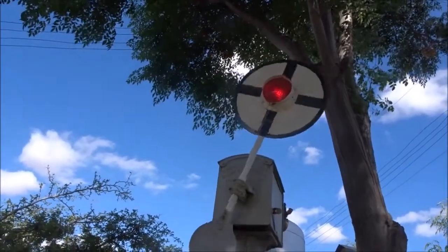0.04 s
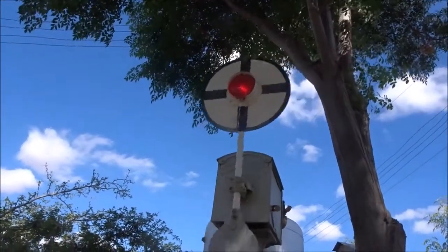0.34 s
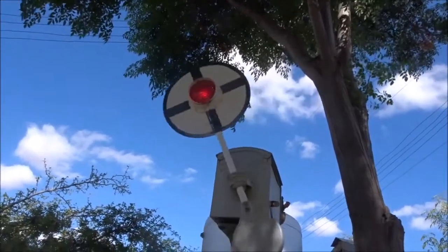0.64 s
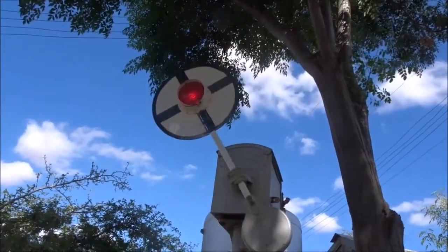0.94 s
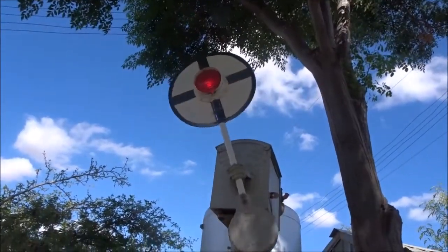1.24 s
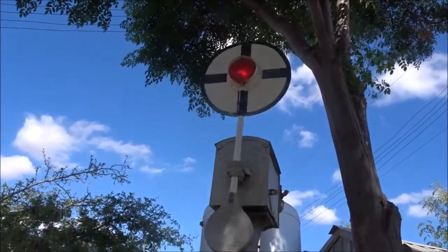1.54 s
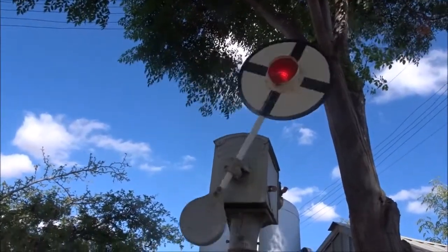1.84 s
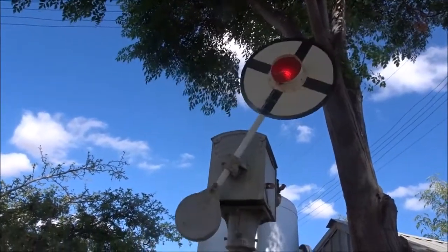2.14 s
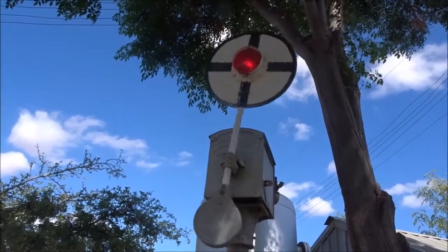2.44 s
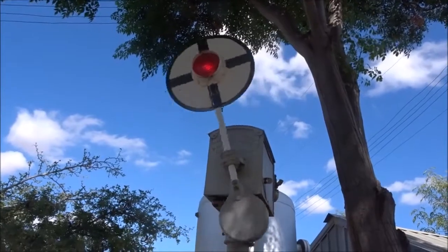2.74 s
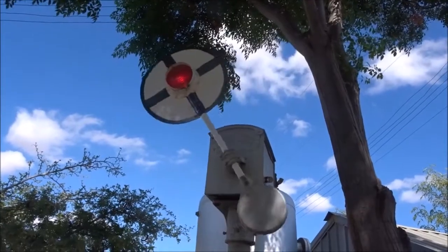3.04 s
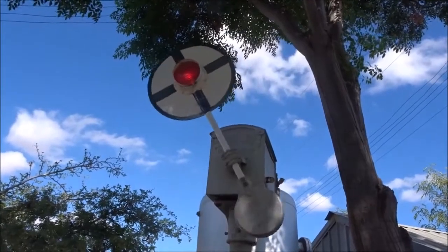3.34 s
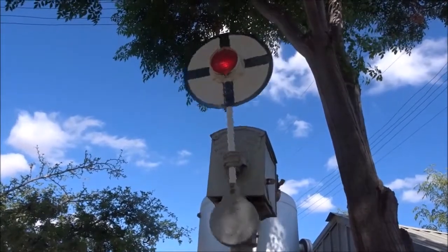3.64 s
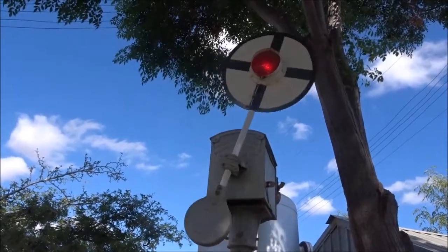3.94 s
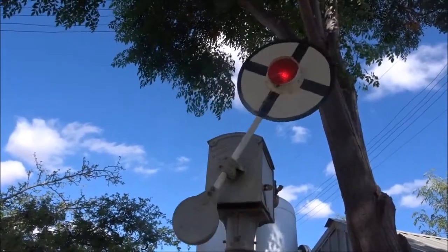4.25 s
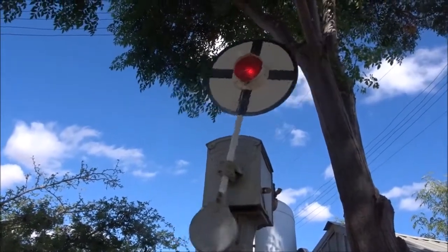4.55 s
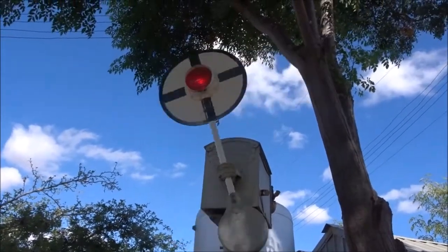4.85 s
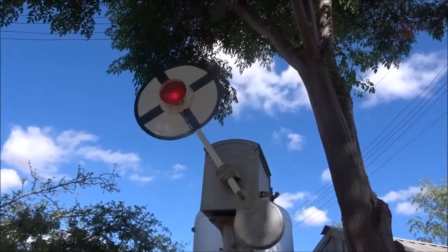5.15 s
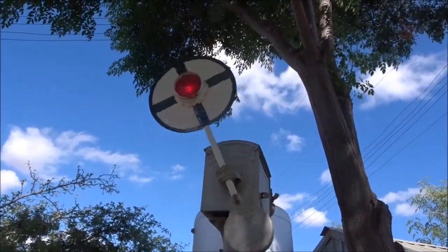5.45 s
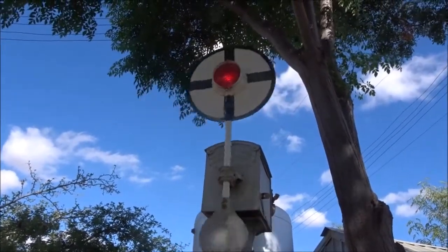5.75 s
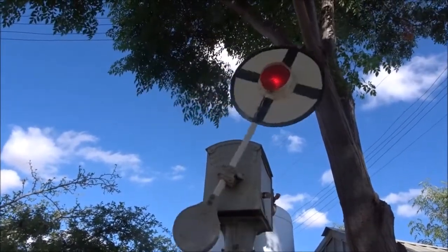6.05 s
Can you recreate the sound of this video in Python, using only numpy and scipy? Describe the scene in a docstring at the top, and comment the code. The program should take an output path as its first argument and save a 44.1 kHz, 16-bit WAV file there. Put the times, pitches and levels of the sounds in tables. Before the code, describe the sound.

A mechanical railroad crossing signal works outdoors, a few metres away. At the start, the faint tail of a bell clang fades out. From about 0.3 seconds the swinging arm's drive gives a quick cluster of metallic knocks and a hollow clack, and this repeats roughly once a second, alternately sharper and duller. After each cluster a hammer strikes a damped bell, at about 0.8, 1.9, 3.0, 4.1 and 5.1 seconds. These clangs are the loudest sounds, bright and clattery, each dying within about half a second. Dry pivots add thin high squeaks and lower raspy creaks in between. A last group of knocks and a clack comes at around 5.7 to 6 seconds. The yard adds a short echo over a faint steady hush, and light wind puffs on the microphone, strongest with a low thump near 1.9 seconds.

```python
"""Outdoors in a yard, a few metres from a wigwag crossing signal that swings to and fro.
On every swing its drive knocks, a contact rocker clacks over, dry pivots squeak by stick-slip friction
and a hammer clangs a damped gong. Each impact excites modes that decay freely, and the yard scatters
a short echo. Light wind puffs on the microphone over a distant hush, and a limiter flattens the start
of each clang."""
import sys
import numpy as np
from scipy import signal
from scipy.fft import rfft, irfft
from scipy.io import wavfile
from scipy.ndimage import uniform_filter1d, minimum_filter1d

SR = 44100
rng = np.random.default_rng(int(sys.argv[2]) if len(sys.argv) > 2 else 0)


def int16_out(signal):
    """Quantize to a 16-bit WAV file."""
    q = np.round(np.clip(np.atleast_2d(signal).T, -1, 1) * 32767)
    wavfile.write(sys.argv[1], SR, q.astype(np.int16))


N = 268628
T = np.arange(N) / SR
RING_TIME = T[:SR]  # the first second after a blow

# swings of the arm: direction, slack_s, drive_s, clack_s, settle_s, squeak_gain_db
SWINGS = [("left", .282, .335, .4846, .575, -3), ("right", 1.488, 1.557, 1.74, 1.82, 2),
          ("left", 2.478, 2.558, 2.696, 2.775, 1), ("right", 3.689, 3.763, 3.923, 4.002, -2),
          ("left", 4.594, 4.674, 4.805, 4.880, 1), ("right", 5.715, 5.783, 5.943, 6.013, -1)]


def undb(db):
    """Decibels to amplitude ratio."""
    return 10 ** (np.asarray(db) / 20)


def unit(x):
    """Normalisation to rms 1."""
    return x / np.sqrt(np.mean(x ** 2))


def fade(t60):
    """Exponential free decay, one second long."""
    return np.exp(-np.log(1000) * RING_TIME / max(t60, .005))


def swell(rise_s):
    """Finite rise time: vibration needs a moment to spread through a struck part."""
    return 1 - np.exp(-(RING_TIME / rise_s) ** 2)


def add(out, start_s, x):
    """Superposition of x on out from start_s on."""
    start = int(round(start_s * SR))
    first, end = max(start, 0), min(start + x.shape[-1], N)
    if end > first:
        out[:, first:end] += x[..., first - start:end - start]


def colour(x, points, size=2048):
    """Minimum-phase filtering through (frequency_hz, level_db) points; white noise keeps its power."""
    hz, db = np.transpose(points)
    grid_hz = np.linspace(1, SR / 2, size + 1)
    curve_db = np.interp(np.log(grid_hz), np.log(hz), db) - 60 * (grid_hz > SR / 3)
    cepstrum = irfft(np.log(unit(undb(curve_db))))
    cepstrum[1:size] *= 2  # folding the cepstrum makes the filter causal
    cepstrum[size + 1:] = 0
    impulse_response = irfft(np.exp(rfft(cepstrum)))
    return signal.fftconvolve(x, impulse_response[None], axes=1)[:, :x.shape[1]]


def shelf(x, hz, low_db=0, high_db=0):
    """First-order shelving: separate gains below and above hz."""
    low = signal.sosfilt(signal.butter(1, hz, fs=SR, output="sos"), x)
    return low * undb(low_db) + (x - low) * undb(high_db)


def wander(rate_hz, count):
    """Linear interpolation between random values, at rms 1."""
    step = max(int(SR / rate_hz), 1)
    stairs = np.repeat(rng.standard_normal(count // step + 1), step)
    return unit(uniform_filter1d(stairs, step)[:count])


def air_noise(count, split_hz=1200, pan_db=1.5, lag_samples=2, diffuse=.65):
    """Partial coherence at two microphone ports: the right leads, and the treble is partly unrelated."""
    mid, side = rng.standard_normal((2, count))
    side = diffuse * signal.sosfilt(signal.butter(1, split_hz, "high", fs=SR, output="sos"), side)
    left = np.roll(mid + side, lag_samples) * undb(pan_db / 2)
    right = (mid - side) * undb(-pan_db / 2)
    return unit(np.array([left, right]))


def burst(t60, treble_hz=3500, treble_stretch=.8):
    """Modal overlap: the dense ringing of struck metal merges into noise whose treble dies sooner."""
    noise = air_noise(SR)
    low = signal.sosfiltfilt(signal.butter(2, treble_hz, fs=SR, output="sos"), noise)
    return low * fade(t60) + (noise - low) * fade(t60 * treble_stretch)


def ring(modes, stretch, spread_hz=6000, pan_db=-1.5, lag_s=.00004, scatter_db=2.5):
    """Modal superposition, mixed anew by each blow; higher modes reach the two ports out of phase."""
    out, t = np.zeros((2, SR)), RING_TIME[:SR // 2]
    for hz, db, t60 in modes:
        phase = rng.uniform(0, 2 * np.pi) + rng.standard_normal((2, 1)) * hz / spread_hz
        cycles = hz * (1 + 0.00492 * rng.standard_normal()) * (t - np.array([[lag_s], [0]]))
        envelope = undb(db + scatter_db * rng.standard_normal()) * fade(t60 * stretch)[:len(t)]
        out[:, :len(t)] += envelope * np.sin(2 * np.pi * cycles + phase)
    return out * swell(rise_s=0.00094) * undb([[pan_db / 2], [-pan_db / 2]])


def yard(x, wet_db, t60, build_s=0.014, dull_db=-5):
    """Diffuse scattering: tree, sheds and ground add a short echo, duller than the direct sound."""
    scatter = air_noise(SR, diffuse=1.0) * fade(t60) * (1 - np.exp(-RING_TIME / build_s))
    echo = shelf(scatter, hz=6300, high_db=dull_db)
    echo /= np.sqrt(np.sum(echo ** 2) / 2)  # unit energy per channel
    return x + undb(wet_db) * signal.fftconvolve(x, echo, axes=1)[:, :N]


def hush(level_db=-51, wander_db=0.58):
    """Incoherent summation: leaves and far surroundings merge into a gently swelling noise."""
    # ambient spectrum: frequency_hz, level_db
    spectrum = [(18, -61), (30, -14), (146, -29), (264, -13), (567, -.5), (822, 1), (930, 2.5), (1640, -9),
                (2000, -3), (2900, -9.5), (4300, -12), (8810, -22), (11000, -24), (14300, -60)]
    noise = unit(colour(air_noise(N, split_hz=600, pan_db=1, diffuse=1.0), spectrum))
    return noise * undb(level_db + wander_db * wander(3.82, N))


def breeze(calm_db=-70.5, wander_db=4.5, attack_s=.035, release_s=.03):
    """Amplitude envelope of the wind: gusts rise, hold and die exponentially over wandering light air."""
    # gusts on the microphone: start_s, length_s, level_db
    gusts = [(.3, .2, -56), (.9, .07, -58), (1.5, .51, -45.5), (1.77, .14, -38), (3.22, .14, -49.5),
             (3.48, .13, -52), (3.84, .14, -51.5), (4.21, .04, -54), (4.76, .16, -54), (5.3, .1, -52)]
    strength = undb(calm_db + wander_db * wander(5, N))
    for start_s, length_s, db in gusts:
        early, late = np.maximum(start_s - T, 0), np.maximum(T - start_s - length_s, 0)
        strength = np.maximum(strength, undb(db) * np.exp(-early / attack_s - late / release_s))
    return strength


def wind(eddy_db=3.5, eddy_rate_hz=60, buffet_hz=270, buffet_s=0.0016):
    """Turbulent pressure: eddies rumble on the microphone, the strongest as single low thumps."""
    # rumble spectrum: frequency_hz, level_db
    spectrum = [(25, -17), (60, -16), (110, -5), (180, 1), (330, 0), (550, -6.5), (1000, -32), (2500, -75)]
    # single thumps: centre_s, level_db
    buffets = [(1.51, -32.5), (1.843, -20), (1.928, -12.5), (1.976, -28), (3.348, -33), (5.356, -35)]
    eddies = air_noise(N, split_hz=150, pan_db=-0.5, diffuse=1.0)
    eddies *= undb(eddy_db * wander(eddy_rate_hz, N))
    out = unit(colour(eddies, spectrum)) * breeze()
    for centre_s, db in buffets:
        t = T - centre_s
        out += undb(db) * np.exp(-(t / buffet_s) ** 2) * np.sin(2 * np.pi * buffet_hz * t)
    return out


def pivots(jitter=0.023, slip_rate_hz=450, rasp=0.51, rasp_rate_hz=420, taper=0.63, lag_s=.00004):
    """Stick-slip friction in dry bearings: short gliding tones that break up into a rasp."""
    # squeaks by direction: after_clack_s, length_s, pitch_hz, glide_octaves, level_db, roughness
    squeaks = {"left": [(-.25, .1, 10020, -.02, -54, .6), (-.104, .048, 6070, -.06, -41, .35),
               (.085, .12, 1690, -.4, -46.5, 1.05), (.18, .13, 1590, .07, -44.3, .8)],
               "right": [(-.092, .14, 6450, .12, -41.5, .7), (.437, .19, 1745, .03, -51, .27)]}
    # squeaks out of turn: start_s, length_s, pitch_hz, glide_octaves, level_db, roughness
    strays = [(.041, .04, 6680, .03, -55, .5), (.063, .05, 10050, -.02, -54, .4),
              (.209, .06, 8640, .03, -46.5, .35)]
    out = np.zeros((2, N))
    regular = [(clack_s + after_s, length_s, pitch_hz, glide, db + swing_db, roughness)
               for direction, _, _, clack_s, _, swing_db in SWINGS
               for after_s, length_s, pitch_hz, glide, db, roughness in squeaks[direction]]
    for start_s, length_s, pitch_hz, glide, db, roughness in regular + strays:
        count = int(length_s * SR)
        hz = pitch_hz * 2 ** (glide * np.linspace(-.5, .5, count))
        hz *= 1 + jitter * roughness * wander(slip_rate_hz, SR)[:count]
        chatter = wander(rasp_rate_hz, SR) + 1j * wander(rasp_rate_hz, SR)
        grip = 1 - min(roughness, 1) + rasp * roughness * chatter[:count]
        cycles = np.cumsum(hz) / SR - hz * np.array([[lag_s], [0]])  # the left port hears it later
        tone = (grip * np.exp(2j * np.pi * cycles)).imag
        add(out, start_s, undb(db) * unit(tone * signal.windows.tukey(count, taper)))
    return out


def linkage(modes_db=-7.5, stretch_per_s=2.6, bounce_s=0.006, bounce_t60=0.063, rise_s=0.002):
    """Backlash: slack in the drive is taken up with a knock and a quick second contact."""
    # slack, drive and settling knocks by direction: level_db, t60_s, body_db, rattle_db
    knocks = {"left": [(-36, .6, 2, -2), (-21, .29, -8, -3), (-26, .34, -.5, -1)],
              "right": [(-45.5, .45, 5, -5), (-27, .52, 3.5, 0), (-28, .29, -1.5, -2)]}
    # loose joints ticking ahead of the drive knock: lead_s, level_db, t60_s, body_db, rattle_db
    ticks = {"left": [(.17, -50, .3, 2, -10), (.125, -47, .45, 3, -4), (.025, -39, .45, 4, 2)],
             "right": [(.022, -46, .25, 13, 0)]}
    # linkage spectrum: frequency_hz, level_db
    spectrum = [(70, -45.5), (200, -25.5), (450, -10), (750, 3.5), (1000, 4.5), (1250, -3), (1900, -.5),
                (2500, -8), (3500, 5), (4600, 1.5), (6000, -2), (8500, -5.5), (11000, -14)]
    # linkage modes, their decay scaled by each blow: frequency_hz, level_db, base_t60_s
    modes = [(690, -9, .25), (915, -3, .25), (2180, -10, .2), (2630, -9, .2), (3720, -4, .2),
             (4140, -2, .22), (4380, -5, .2), (5430, -7, .15), (7560, -11, .18), (8580, -12, .18)]
    out = np.zeros((2, N))
    for direction, slack_s, drive_s, _, settle_s, _ in SWINGS:
        blows = [(s, *knock) for s, knock in zip((slack_s, drive_s, settle_s), knocks[direction])]
        blows += [(drive_s - lead_s, *tick) for lead_s, *tick in ticks[direction]]
        for start_s, db, t60, body_db, rattle_db in blows:
            knock = colour(burst(t60) * swell(rise_s), spectrum)
            knock += undb(modes_db) * ring(modes, stretch_per_s * t60)
            add(out, start_s, undb(db) * shelf(knock, hz=2250, low_db=body_db))
            rattle = colour(air_noise(SR) * fade(bounce_t60), spectrum)
            add(out, start_s + bounce_s, undb(db + rattle_db) * rattle)
    return out


def rocker(modes_db=-5, snap_db=4, snap_t60=0.053, bounce_s=.013, bounce_db=-10):
    """Impact and rebound: the contact rocker snaps over, rings hollow near 1 kHz and bounces once."""
    # clacks by direction, harder one way than the other: level_db, t60_s, treble_db
    clacks = {"left": (-18.8, .22, .8), "right": (-21.3, .5, -18)}
    # rocker spectrum: frequency_hz, level_db
    spectrum = [(80, -62), (250, -45.5), (550, -7), (800, -14.5), (1000, 6.5), (1300, -6.5), (2500, -15),
                (3400, 0.5), (4200, -6), (5200, 2), (7000, -8.5), (9000, -8), (11000, -13)]
    # rocker modes, their decay halved on the rebound: frequency_hz, level_db, base_t60_s
    modes = [(939, -3, 0.22), (1000, -15, 0.3), (1083, -7.5, 0.22), (3190, -7, 0.18), (3250, 1, 0.075),
             (3720, -11, 0.27), (4520, 1.5, 0.11), (4950, 10, 0.04), (5043, 0.5, 0.084), (6040, 2.5, 0.083),
             (8400, -3.5, 0.079)]
    out = np.zeros((2, N))
    for direction, _, _, clack_s, _, _ in SWINGS:
        db, t60, treble_db = clacks[direction]
        for delay_s, blow_db, stretch in ((0, 0, 1), (bounce_s, bounce_db, .5)):
            impact = burst(t60 * stretch) + air_noise(SR) * undb(snap_db) * fade(snap_t60)
            clack = undb(-3) * colour(impact, spectrum) + undb(modes_db) * ring(modes, stretch)
            add(out, clack_s + delay_s, undb(db + blow_db) * shelf(clack, hz=3000, high_db=treble_db))
    return out


def case_clatter(stretch, clatter_db=-8.7, clatter_t60=0.57, crack_db=-2, crack_t60=0.09):
    """Broadband shock excitation: a hammer blow shakes the gong's case with a crack and a clatter."""
    # case spectrum: frequency_hz, level_db
    spectrum = [(60, -66), (150, -41), (400, -13.5), (800, 1.5), (1200, -1), (1750, 3), (2300, 0.5),
                (3000, 0.5), (4000, 5.5), (5500, -2), (7000, -2), (9000, -4.5), (11000, -23)]
    envelope = undb(clatter_db) * fade(clatter_t60 * stretch) + undb(crack_db) * fade(crack_t60)
    return colour(air_noise(SR, pan_db=1.0) * envelope, spectrum)


def gong_partial(hz, twin_gain=.42, detune=0.0055, shiver_depth=.27, shiver_rate_hz=110):
    """Mode splitting: a complex partial beats with its twin and shivers on the loose mounting."""
    beat_hz = hz * detune * rng.standard_normal()
    twin_phase = np.exp(2j * np.pi * rng.random((2, 1)))  # the twin radiates differently to each port
    beat = twin_gain * min(hz / 2000, 1) * np.exp(2j * np.pi * beat_hz * RING_TIME) * twin_phase
    shiver = shiver_depth * (wander(shiver_rate_hz, SR) + 1j * wander(shiver_rate_hz, SR))
    return (1 + beat + shiver) * np.exp(2j * np.pi * (hz * RING_TIME + rng.random()))


def gong(after_db=-41.5, after_t60=1.4, rise_s=0.0023, build_cycles=9, favour_width_hz=60):
    """Damped inharmonic modes, weighted by the striking place; a faint after-ring outlasts the clang."""
    # hammer blows: start_s, level_db, striking_place, decay_stretch, favoured_hz, favour_db
    strikes = [(-.38, -9, 1.4, .8, 1992, 0), (.755, -6, .18, .93, 7177, 3),
               (1.921, -7.5, -1.7, .83, 6165, 4), (2.952, -5.3, -.3, .66, 1992, 3.5),
               (4.098, -7, -1.6, .76, 4312, 4.5), (5.055, -9.7, 1.1, 1, 1992, 2.5)]
    # gong modes: frequency_hz, level_db, base_t60_s, place_slope_db, left_minus_right_db, left_lead_rad
    modes = [ (301, -26, .62, 3, 0, -.1), (771, -12.5, .56, 5, 0, -.4), (1350, -10.5, .48, 2, -7, 0),
             (1540, -18.5, .55, 4, -2, -.1), (1992, -6.7, .55, 2.8, 4, -.4), (2288, -15.5, .5, 0, 0, -1.5),
             (2701, -3.3, .43, -2.5, 5, -1.8), (3402, -14.5, .5, 1, 3, .7), (3474, -2.9, .51, 1, 2, 2.1),
             (3871, -14.5, .55, 1, 3, -1.8), (4037, -15, .52, -1, 2, -.9), (4167, -15, .44, 0, 6, .9),
             (4312, -4.3, .5, -1, 6, .9), (4404, -14, .45, 0, 6, .8), (5206, -6.2, .46, -1, -1, -1.7),
             (5324, -13.5, .45, -1, 0, -1.7), (5620, -15, .52, 0, 0, -1.9), (5729, -9.5, .62, 1, 0, -1.8),
             (6165, -3.2, .43, -2, 3, -1.8), (6761, -11.5, .45, 2, 0, -2.2), (7177, -5.8, .45, 0, 2, 1.3),
             (7994, -15, .44, -1, 3, 2.4), (8284, -1.5, .39, -1, 4, 2.5), (8666, -19, .7, 0, 2, 2.5),
             (9281, -18, .41, 0, 2, 2.3), (9433, -8.5, .42, 0, 2, 2.3), (10649, -10, .37, 2, -8, -2.5)]
    out = np.zeros((2, N))
    for start_s, db, place, stretch, favoured_hz, favour_db in strikes:
        clang = case_clatter(stretch)
        for hz, mode_db, t60, place_slope_db, pan_db, lead_rad in modes:
            envelope = fade(t60 * stretch) + undb(after_db) * fade(after_t60)
            envelope *= 1 - np.exp(-hz * RING_TIME / build_cycles)  # the low hum builds up last
            ports = np.array([[undb(pan_db / 2) * np.exp(1j * lead_rad)], [undb(-pan_db / 2)]])
            nearness = np.exp(-((hz - favoured_hz) / favour_width_hz) ** 2)
            drive_db = place * place_slope_db + favour_db * nearness
            clang += undb(mode_db + drive_db) * envelope * (ports * gong_partial(hz)).imag
        add(out, start_s, undb(db) * clang * swell(rise_s))
    return out


def scene():
    """Superposition of the signal in its yard, wind and hush; the pivots have the larger share of echo."""
    impacts = yard(gong() + linkage() + rocker(), wet_db=-15.5, t60=0.36)
    squeaks = yard(pivots(), wet_db=-2.5, t60=0.16)
    return impacts + squeaks + wind() + hush()


def record(dry, ceiling_db=-15.7, knee=8, sense_s=0.0045, hold_s=0.0017, rumble_hz=65, top_hz=11050):
    """Band and level limiting: deep bass rolls off, one fast gain holds both channels, the top is cut."""
    dry = signal.sosfilt(signal.butter(2, rumble_hz, "high", fs=SR, output="sos"), dry)
    sense, hold = int(sense_s * SR) + 1, int(hold_s * SR) + 1
    power = uniform_filter1d(np.mean(dry ** 2, axis=0), sense)
    gain = (1 + (np.sqrt(abs(power)) / undb(ceiling_db)) ** knee) ** (-1 / knee)
    held_gain = minimum_filter1d(gain, hold, origin=(hold - 1) // 2)
    limited = dry * uniform_filter1d(held_gain, sense)
    return signal.sosfilt(signal.ellip(10, .2, 80, top_hz, fs=SR, output="sos"), limited)


dry = scene()
out = record(dry)
int16_out(out)
```